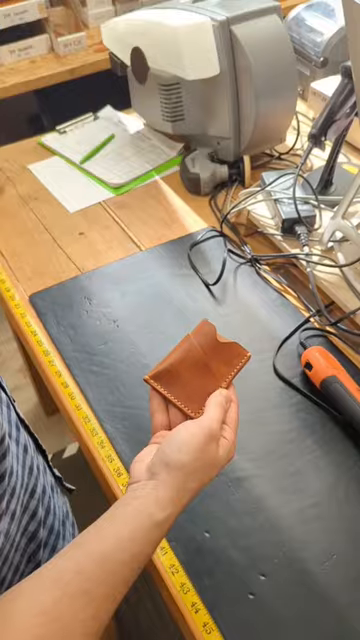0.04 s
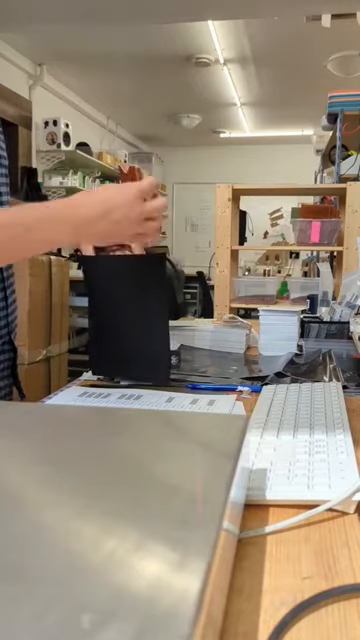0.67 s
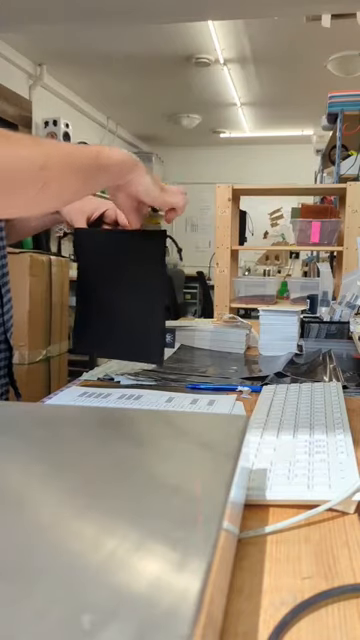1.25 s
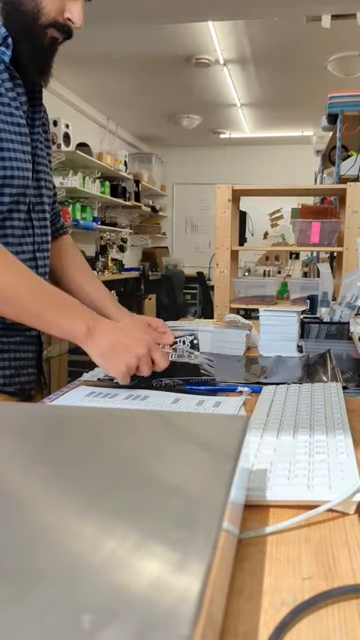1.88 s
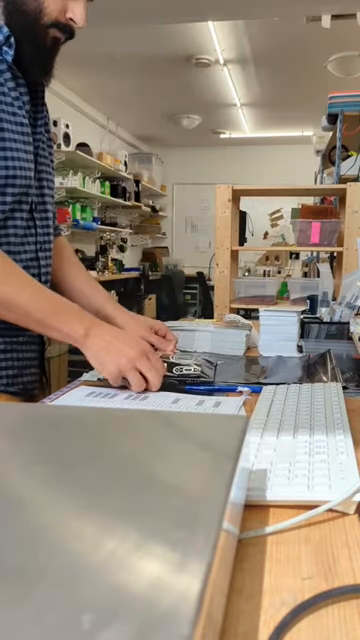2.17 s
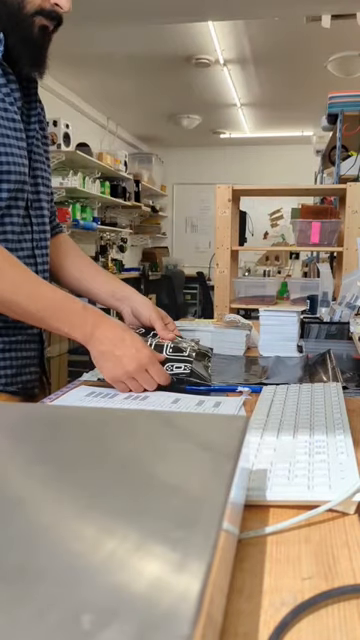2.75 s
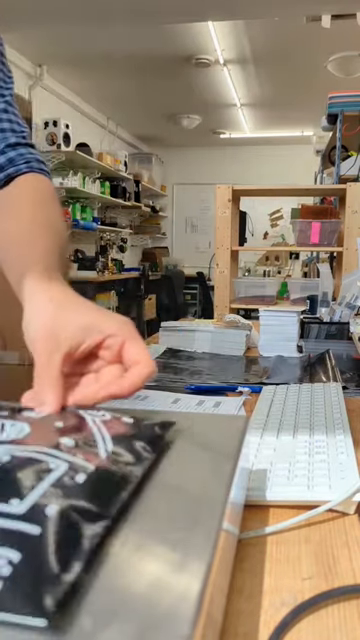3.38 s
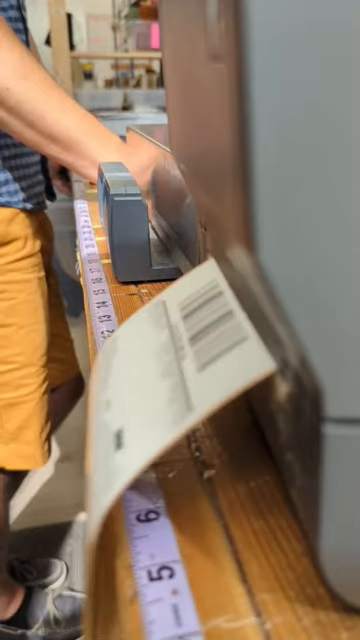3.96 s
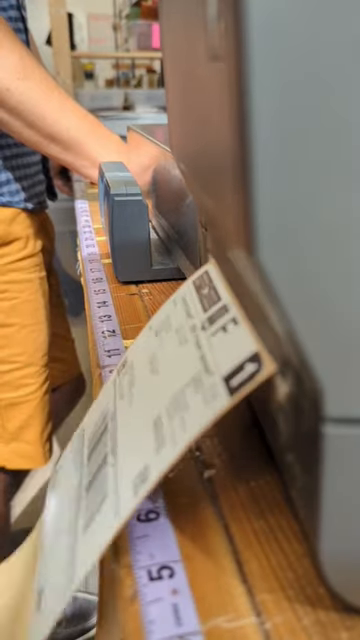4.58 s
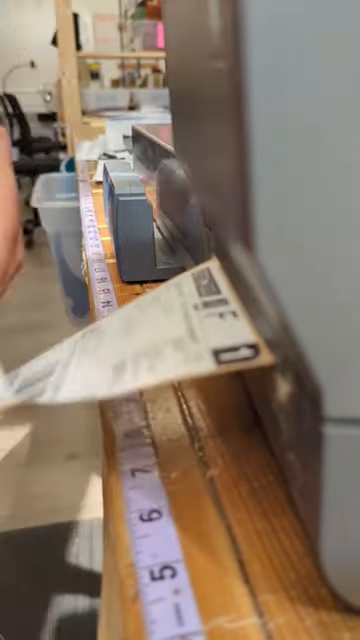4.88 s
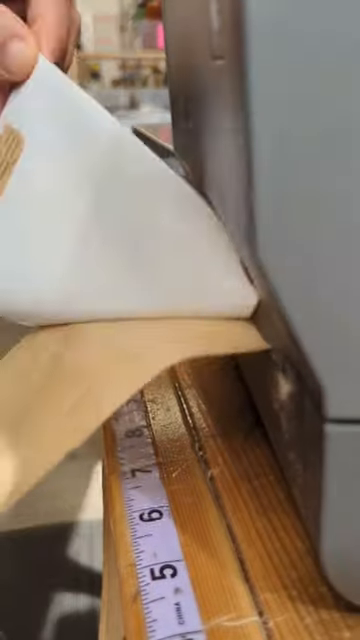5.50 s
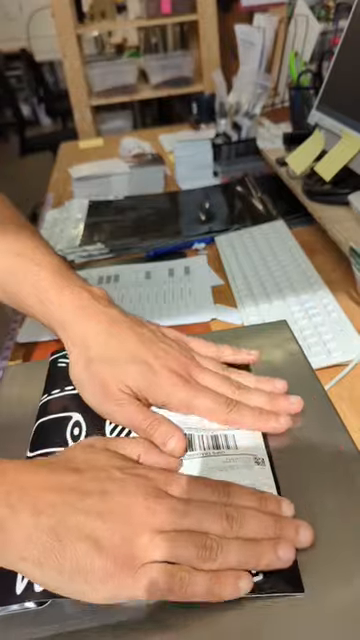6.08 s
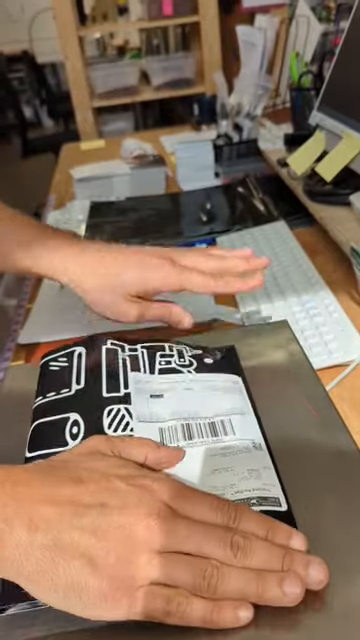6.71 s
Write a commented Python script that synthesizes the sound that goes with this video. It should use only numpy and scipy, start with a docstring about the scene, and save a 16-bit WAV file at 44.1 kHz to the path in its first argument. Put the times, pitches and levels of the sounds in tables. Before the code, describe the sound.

A plastic mailer rustles and cracks, then a label printer whines and squeals, the label rips free and palms smooth it down.

```python
"""A label printer whirs and squeals as an order is packed in a workshop. First a wallet drops into a soft
pouch, and a plastic mailer rustles and cracks as it is folded shut. Then the printer's stepper motor sings
at multiples of its step rate while the label sticks and slips on the roller. The label hisses off its
backing, rips free in a few jerks, and palms smooth it onto the parcel, popping small creases.
Quick fades divide the sound into eight short parts."""
import sys
import numpy as np
from scipy import signal
from scipy.fft import rfft, irfft, next_fast_len
from scipy.io import wavfile
from scipy.ndimage import uniform_filter1d, map_coordinates

SR = 44100
rng = np.random.default_rng(int(sys.argv[2]) if len(sys.argv) > 2 else 0)


def to_wav(s):
    """Save 16-bit WAV."""
    ch = np.atleast_2d(s).T  # columns
    pcm = np.round(np.clip(ch, -1, 1) * 32767)  # PCM
    wavfile.write(sys.argv[1], SR, pcm.astype(np.int16))


N = 297234

# The times in seconds where one part ends and the next begins.
JOINS = [0.61, 1.58, 3.008, 3.674, 4.524, 4.935, 6.042]
# Jerks that rip the label off. Each row: start in seconds, level in dB, bass lift in dB, pitch in Hz.
JERKS = [(5.243, -28, -14, 1500), (5.253, -15.5, 8, 704), (5.266, -19.5, 0, 1410), (5.286, -16, -2, 825),
         (5.315, -15.5, 2, 1410)]
# Spectra: how strong a sound is from low to high. Each row: frequency in Hz, level in dB.
FILM_RUB = [(200, -4.5), (700, 0), (1200, -2.5), (1900, 3), (3200, -5.5), (4800, -15.5), (9000, -55)]  # rubbed plastic film
FILM_CRINKLE = [(1800, -66), (3200, -8), (4900, -10), (6100, -0.5), (9000, -7.5), (15500, -12)]  # its tiny creases
GEAR_RATTLE = [(410, -37.5), (700, -13.5), (807, -4.5), (861, -12), (943, -8), (1320, 1), (1470, -8.5),
               (1690, -8), (2250, -7), (2840, -14), (4580, -22.5), (8500, -31), (15500, -33.5)]  # the printer's gears
LABEL_RUB = [(150, -24), (300, 2.5), (700, 2.5), (1200, 6), (1900, 5), (3000, -0.5), (4500, -16),
             (9000, -52)]  # the rubbed label
GLUE_HISS = [(1800, -37), (3200, -1.5), (6200, 3), (9000, 0), (15500, 0.5)]  # its sticky side


def amp(db):
    """Turn decibels into a gain."""
    return 10 ** (np.asarray(db) / 20)


def unit(x):
    """Scale a signal to an average (rms) level of 1."""
    return x / np.sqrt(np.mean(x ** 2) + 1e-20)


def along(points, hz):
    """Read between (Hz, value) points on a logarithmic frequency axis."""
    freqs, values = np.transpose(points)
    return np.interp(np.log(hz + 1), np.log(freqs + 1), values)


def wobble(rate):
    """A smooth curve through `rate` random values a second."""
    return map_coordinates(rng.standard_normal(4096), [np.arange(N) * rate / SR], mode='wrap')


def phase(hz, jitter, rate):
    """The phase of a slightly unsteady vibration."""
    return 2 * np.pi * np.cumsum(hz * (1 + jitter * wobble(rate))) / SR


def hold(start, stop, attack, release):
    """A gain that rises at start, holds, and dies away after stop (all in seconds)."""
    t = np.arange(N) / SR
    return np.clip((t - start) / attack, 0, 1) * np.exp(-np.maximum(t - stop, 0) / release)


def swell(middle, half_length):
    """A bell-shaped gain (both settings in seconds)."""
    return np.exp(-((np.arange(N) / SR - middle) / half_length) ** 2 / 2)


def colour(x, gain_db):
    """Filter x by the curve gain_db(Hz), ringing only after each sound, never before."""
    size = 2 * next_fast_len(len(x) // 2 + 1024)
    gain = np.maximum(amp(gain_db(np.fft.rfftfreq(size, 1 / SR))), 1e-6)
    cepstrum = irfft(np.log(gain))
    cepstrum[1:size // 2] *= 2  # move the early half of the response onto the late half
    cepstrum[size // 2 + 1:] = 0
    return irfft(rfft(x, size) * np.exp(rfft(cepstrum)), size)[:len(x)]


def shaped(x, spectrum):
    """Filter x by a spectrum table and scale it to level 1."""
    return unit(colour(x, lambda hz: along(spectrum, hz)))


def tone(spectrum, bass_db, treble_db):
    """A spectrum curve with its bass and treble turned up or down."""
    treble = [(1800, 0), (4500, 1.0), (9000, 0.97), (14000, 0.82)]  # Each row: Hz, share of the lift.
    return lambda hz: along(spectrum, hz) + bass_db / (1 + (hz / 650) ** 2) + treble_db * along(treble, hz)


def ringing(sheet, hz):
    """A sheet's spectrum curve plus the broad resonance of one buckled patch at hz."""
    return lambda f: sheet(f) + 7.5 / (1 + ((f - hz) / (0.24 * hz)) ** 2)


def flexing(x, depth_db):
    """Resonances drift at random as a sheet or mechanism moves."""
    bands = signal.stft(x, nperseg=512)[2]
    drift = uniform_filter1d(rng.standard_normal(bands.shape), size=4, axis=0)  # smooth over frequency
    drift = uniform_filter1d(drift, size=9, axis=1)  # and over time
    return signal.istft(bands * amp(depth_db * unit(drift)), nperseg=512)[1][:len(x)]


def grains(rate, spread_db, smooth, life=0.0021):
    """Tiny random slips, each a puff fading over `life` seconds, on a bed of smooth friction noise."""
    sizes = amp(spread_db * rng.uniform(-1.4, 1, N)) * (rng.random(N) < rate / SR)
    power = signal.lfilter([1], [1, -np.exp(-1 / (life * SR))], sizes ** 2)
    return unit(np.sqrt(power) * rng.standard_normal(N)) + smooth * rng.standard_normal(N)


def burst(decay, rise=0.00074):
    """Noise that builds up quickly and falls by 60 dB in `decay` seconds."""
    t = np.arange(SR // 4) / SR
    return rng.standard_normal(len(t)) * amp(-60 * t / max(decay, .001)) * (1 - np.exp(-(t / rise) ** 2))


def sized(x, db):
    """Scale a blow so that its loudest 3 ms have the level db."""
    return amp(db) * x / np.sqrt(uniform_filter1d(x ** 2, size=132).max())


def add(track, seconds, x):
    """Mix x into the track at the given time."""
    start = int(seconds * SR)
    track[start:start + len(x)] += x[:N - start]


def in_room(x, echo_db):
    """A sound followed by the workshop's short, blurred echo."""
    # How long the room rings. Each row: frequency in Hz, seconds to fall by 60 dB.
    decays = [(150, 0.29), (1000, 0.14), (6000, 0.21), (15000, 0.11)]
    hz, t, bands = signal.stft(rng.standard_normal(SR // 3), SR, nperseg=256)
    tail = signal.istft(bands * amp(-60 * t / along(decays, hz)[:, None]), SR, nperseg=256)[1]
    tail *= 1 - np.exp(-np.arange(len(tail)) / SR / 0.00076)
    response = amp(echo_db) * tail / np.linalg.norm(tail)
    response[0] = 1  # the direct sound
    return signal.fftconvolve(x, response)


def handling(effort, rub_spectrum, hiss_spectrum, bump_db, rub_db, crinkle_db, rate, smooth):
    """One effort makes the hands bump the bench, rub the sheet and set off tiny creases."""
    pressure = amp(1.8 * wobble(40))
    creases = flexing(pressure * grains(rate, spread_db=6.5, smooth=smooth), depth_db=2.5)
    hiss = flexing(rng.standard_normal(N), depth_db=0.5)
    # The bumped bench. Each row: frequency in Hz, level in dB.
    bench = [(25, -51), (60, 0.5), (150, 2.5), (290, -3), (480, -8.5), (1000, -58.5)]
    return effort * (amp(bump_db) * shaped(pressure * rng.standard_normal(N), bench)
                     + amp(rub_db) * shaped(creases, rub_spectrum)
                     + amp(crinkle_db) * shaped(creases + hiss, hiss_spectrum))


def buckle(crack, db, sheet, echo_db):
    """A crack rings a buckled patch of a sheet, coloured by a close echo off the bench at a random delay."""
    spacing_hz = 1100 + 700 * rng.random()  # between the ripples of a close echo off the bench
    ring = colour(crack, lambda hz: sheet(hz) + 3 * np.cos(2 * np.pi * hz / spacing_hz))
    return in_room(sized(ring, db - 9.5), echo_db)


def room_tone():
    """Still air at first, a fan at the packing bench, a hush at the printer, and a thin high hiss."""
    # The three backgrounds. Each row: frequency in Hz, level in dB.
    still = [(30, -24), (235, -2.5), (1400, -17), (1900, -3.5), (4600, -15), (6000, -9), (15500, -16.5)]
    fan = [(30, -15), (120, -5.5), (175, -14), (245, 6.5), (310, -21), (480, -3), (700, -18), (1500, -18),
           (1870, 0), (2200, -14.5), (3100, -10), (4700, -25), (6200, -15), (9300, -29.5)]
    hush = [(30, -25), (235, -1), (2000, -11.5), (2900, -8), (9000, -32), (15500, -29)]
    t = np.arange(N) / SR
    air = lambda spectrum: shaped(rng.standard_normal(N), spectrum)
    thin_hiss = amp(-86.5) * wobble(600) * np.sin(2 * np.pi * 12250 * t)
    return (amp(-84) * air(still) * (t < JOINS[0])
            + amp(-68) * air(fan) * (t > JOINS[0]) * (t < JOINS[3])
            + amp(-63.5) * air(hush) * (t > JOINS[4]) * (t < JOINS[5])
            + thin_hiss * np.where(t < JOINS[0], .5, 1))


def ticks():
    """Light, distant ticks, each a bright burst of noise."""
    # Each row: start in seconds, level in dB.
    events = [(0.339, -51), (0.4502, -46), (1.386, -47.5)]
    # A tick's spectrum. Each row: frequency in Hz, level in dB.
    spectrum = [(300, -14), (1400, -6.5), (3500, -11.5), (6800, 5), (9000, -3.5), (15000, -12)]
    out = np.zeros(N)
    for start, db in events:
        tick = shaped(burst(decay=0.16), spectrum)
        add(out, start, in_room(sized(tick, db - 13.5), echo_db=-14))
    return out


def pouch():
    """The soft pouch bumps as it is held and shaken open, and rustles round the wallet that drops in."""
    pick_up_s, shake_s, drop_s = 0.69, 0.92, 1.02
    held = hold(pick_up_s, drop_s, attack=.03, release=0.13)
    held += amp(8.5) * hold(shake_s, drop_s, attack=0.011, release=0.065)
    drop = hold(drop_s, drop_s + 0.04, attack=0.0079, release=0.059)
    film = FILM_RUB, FILM_CRINKLE
    return (handling(held, *film, bump_db=-75, rub_db=-85, crinkle_db=-101, rate=740, smooth=1.9)
            + handling(drop, *film, bump_db=-56, rub_db=-53, crinkle_db=-79, rate=1600, smooth=1.2))


def knocks():
    """Soft, dull contacts of pouch, parcel and flapping label, and the printer's rattle and clunk as it stops."""
    # Each row: start in seconds, level in dB, bass lift in dB, decay in seconds.
    events = [(1.025, -33.5, 3, 0.25), (3.609, -32, -8, 0.04), (4.436, -29, -18, 0.072),
              (4.532, -19, -26, 0.03), (4.625, -41.5, -45, 0.13), (4.845, -41.5, 16, 0.015),
              (5.16, -28, -18.5, 0.082), (5.529, -43, -15, 0.3), (5.714, -42.5, 30, 0.048)]
    # A knock's spectrum. Each row: frequency in Hz, level in dB.
    spectrum = [(35, -24), (100, -14), (340, -1.5), (1300, -9), (2800, -20), (9500, -37)]
    out = np.zeros(N)
    for start, db, bass_db, decay in events:
        push = colour(burst(decay, rise=0.0011), tone(spectrum, bass_db, treble_db=-8.5))
        add(out, start + 0.000974, in_room(sized(push, db - 9.5), echo_db=-9))
    return out


def thumps():
    """A blow on parcel, bench or printer case, or a pocket of air trapped in the mailer just after a snap,
    rings one low, short note, blurred by its neighbours."""
    # Each row: start in seconds, level in dB, pitch in Hz, decay in seconds.
    events = [(1.027, -39, 268, 0.17), (1.483, -46.5, 158, 0.07), (1.504, -45, 400, 0.021),
              (1.51, -44.5, 104, 0.064), (1.939, -47, 239, 0.24), (1.966, -43.5, 134, 0.049),
              (3.593, -31.5, 502, 0.02), (3.648, -30.5, 527, 0.017), (4.44, -31, 292, 0.061),
              (4.459, -27, 297, 0.07), (4.534, -16, 334, 0.019), (4.556, -41, 293, 0.13),
              (5.266, -42.5, 145, 0.31), (5.291, -37, 230, 0.056), (6.28, -48, 220, 0.04),
              (6.458, -39, 153, 0.12)]
    out, t = np.zeros(N), np.arange(SR // 4) / SR
    for start, db, hz, decay in events:
        blur = 2.5 * burst(decay)
        note = np.sin(2 * np.pi * hz * t) * amp(-60 * t / decay)
        thump = shaped(note + blur, [(hz / 4, -20), (hz * 0.76, 0), (hz * 2.04, 0), (hz * 10, -45)])
        add(out, start, in_room(sized(thump, db - 5), echo_db=-13))
    return out


def finger_strokes():
    """Fingers slide over pouch, mailer and label; each slide rubs and hisses as it swells and fades."""
    # Each row: middle in seconds, half length in seconds, level in dB, hiss lift in dB.
    events = [(1.507, 0.019, -63, 7), (1.665, 0.016, -54.5, 1.5), (1.75, 0.026, -63.5, 1),
              (1.988, 0.035, -62.5, 3.5), (2.292, 0.029, -65.5, 4.5), (2.485, 0.066, -63, -11),
              (2.81, 0.027, -58, -1), (3.334, 0.02, -61, 7), (3.393, 0.014, -56, -10),
              (3.411, 0.027, -68, 21.5), (6.441, 0.017, -52, -1)]
    creases = flexing(grains(rate=600, spread_db=4, smooth=.5), depth_db=3)
    rub, hiss = shaped(creases, FILM_RUB), shaped(creases, FILM_CRINKLE)
    slides = sum(amp(db) * swell(middle, half_length) * (rub + amp(lift_db - 10.5) * hiss)
                 for middle, half_length, db, lift_db in events)
    return amp(2.5) * in_room(slides, echo_db=-8)[:N]


def folding():
    """The mailer's film stirs all the while it is folded and pressed shut."""
    # How hard the hands work. Each row: time in seconds, effort in dB.
    efforts = [(1.62, -62), (1.87, -66.5), (2.36, -66), (2.7, -64), (2.87, -61), (3.27, -67.5),
               (3.5, -61.5), (3.62, -58), (3.65, -46.5)]
    times, effort_db = np.transpose(efforts)
    effort = amp(np.interp(np.arange(N) / SR, times, effort_db))
    effort *= hold(JOINS[1], JOINS[3], attack=0.095, release=0.017)
    return handling(effort, FILM_RUB, FILM_CRINKLE,
                    bump_db=-7.5, rub_db=1.5, crinkle_db=-7.5, rate=150, smooth=0.92)


def scrunches():
    """The film crumples: one crease sets off the next, each weaker than the last."""
    # Each row: start in seconds, level of the first crease in dB, length in seconds.
    events = [(1.904, -37, 0.05), (2.721, -44.5, 0.018), (2.935, -42, 0.02)]
    # Crumpling film. Each row: frequency in Hz, level in dB.
    spectrum = [(200, -5.5), (1900, 5), (3000, -3), (6200, -3.5), (7500, -23), (15500, -32)]
    gap_s, fade_db_per_s = 0.0075, 162
    out = np.zeros(N)
    for start, db, length in events:
        for delay in np.arange(0, length, gap_s):
            crease = sized(shaped(burst(decay=0.019), spectrum), db - 9.5 - fade_db_per_s * delay)
            uneven_delay = delay * (1 + .04 * rng.standard_normal())
            add(out, start + 0.0012 + uneven_delay, in_room(crease, echo_db=-10))
    return out


def snaps():
    """Film or paper buckles with a sharp crack, rings for a moment and flutters after it."""
    # Each row: start in seconds, level in dB, brightness in dB.
    events = [(2.056, -37.5, 3.5), (2.408, -39, -2), (2.617, -38, -10), (2.937, -32, 5.5),
              (2.946, -34.5, 18), (3.022, -33.5, 3), (3.196, -38, -4.5), (3.481, -35.5, -3),
              (3.4915, -21, 12), (3.5912, -23, 1), (3.6465, -21, 0), (3.6555, -36, -4), (4.715, -39, 4),
              (5.462, -38.5, 2), (5.58, -30, -7), (5.773, -37.5, -7)]
    # The buckling sheet. Each row: frequency in Hz, level in dB.
    spectrum = [(60, -44), (130, -21.5), (650, 5.5), (1000, -7), (1400, -11), (3400, -5.5), (5000, -9),
                (6100, -6), (15500, -26.5)]
    out = np.zeros(N)
    for start, db, bright_db in events:
        crack = burst(decay=0.0052, rise=0.00099)
        flutter = amp(-34.5) * burst(decay=0.11, rise=0.00021)
        sheet = tone(spectrum, bass_db=-5 - bright_db, treble_db=-12 + 0.82 * bright_db)
        add(out, start + 0.00145, buckle(crack + flutter, db, sheet, echo_db=-9))
    return out


def air_pockets():
    """Air trapped in the mailer drums under the fingers: hollow notes, pitched by each pocket's size."""
    # Each row: middle in seconds, half length in seconds, level in dB, pitch in Hz.
    events = [(2.233, 0.017, -53, 641), (2.547, 0.011, -54, 400), (2.793, 0.009, -47.5, 510),
              (2.828, 0.013, -50, 610), (2.945, 0.0056, -47, 560), (3.363, 0.038, -55, 429),
              (3.397, 0.012, -49, 587), (6.442, 0.024, -51.5, 521)]
    sharpness, octave_db = 7, -8
    note = lambda hz: np.sin(phase(hz, jitter=1 / sharpness, rate=400))
    drum = sum(amp(db) * swell(middle, half_length) * (note(hz) + amp(octave_db) * note(2 * hz))
               for middle, half_length, db, hz in events)
    return in_room(drum * amp(3 * wobble(200)), echo_db=-8)[:N]


def printer():
    """The stepper motor sings at multiples of its step rate and drives rattling gears and a roller."""
    # The motor's tones. Each row: multiple of the step rate, level in dB.
    motor_tones = [(2, -47.5), (3, -52), (4, -51), (5, -53.5)]
    # The rubber roller's rumble. Each row: frequency in Hz, level in dB.
    roller = [(85, -55), (130, -16.5), (216, -15), (263, 3), (516, -6), (633, -0.5), (698, -13.5),
              (823, -9.5), (1870, -75)]
    step_hz, surge_s, surge_width_s = 437.5, 3.755, 0.056
    t = np.arange(N) / SR
    drive = hold(start=3.675, stop=4.5, attack=0.06, release=0.0043)
    step = phase(step_hz, jitter=0.00216, rate=60)
    whine = np.zeros(N)
    for multiple, db in motor_tones:
        level = amp(db + 1.5 + 2.4 * wobble(35))
        gear_play = (.25 + .35 * (multiple % 2)) * wobble(45)  # roughens the odd multiples most
        whine += level * np.sin(multiple * step + gear_play + rng.uniform(0, 2 * np.pi))
    unevenness = amp(1.9 * wobble(180))
    teeth = rng.standard_normal(N) * (1 + 0.19 * np.cos(step)) * unevenness  # rasp pulsing at each step
    rumble = amp(-47.5) * shaped(rng.standard_normal(N), roller)
    surge_db = 4 * np.exp(-((t - surge_s) / surge_width_s) ** 2)  # the gears take up the load
    gears = amp(-44 + surge_db) * shaped(flexing(teeth, depth_db=1.5), GEAR_RATTLE)
    return drive * (whine + gears + rumble)


def label_slips():
    """The label catches in the slot and slips, each time with one rough chirp."""
    # Each row: start in seconds, level in dB.
    events = [(3.745, -27), (3.796, -27.5), (3.919, -25.5), (3.944, -25.5), (3.9475, -20), (4.099, -22),
              (4.337, -26), (4.365, -26.5)]
    chirp_hz, rise_s = 1480, 0.0012
    out, t = np.zeros(N), np.arange(SR // 20) / SR
    kick = t / rise_s * np.exp(1 - t / rise_s)
    for start, db in events:
        hz = chirp_hz * (1 + 0.04 * rng.standard_normal())
        chirp = np.sin(2 * np.pi * hz * t) + 0.45 * shaped(rng.standard_normal(len(t)), GEAR_RATTLE)
        add(out, start, in_room(amp(db - 5) * kick * chirp, echo_db=-8))
    return out


def label_squeal():
    """The label sticks and slips on the roller so fast that it gives a wavering squeal."""
    # Each row: start and stop in seconds, level in dB, lift of the top overtone in dB.
    events = [(3.746, 3.82, -51.5, 7), (3.954, 4.066, -42.5, -3), (4.357, 4.425, -46, 6)]
    # The squeal's tones. Each row: multiple of the pitch, level in dB.
    overtones = [(1, 3), (2, -11), (3, -13.5), (4, -26), (6, -26.5)]
    cycle = phase(hz=1620, jitter=0.0021, rate=140)
    out = np.zeros(N)
    for start, stop, db, lift_db in events:
        grip = amp(db) * hold(start, stop, attack=0.033, release=0.017)
        wave = sum(amp(tone_db + lift_db * (multiple - 1) / 5) * np.sin(multiple * cycle)
                   for multiple, tone_db in overtones)
        out += grip * np.sqrt(2) * wave
    return in_room(out * amp(1.3 * wobble(120)), echo_db=-17)[:N]


def peeling():
    """Fingers grip the label, which hisses off its backing; once torn free, the strip also bumps about."""
    grip = hold(JOINS[5], JOINS[5] + 0.059, attack=0.0053, release=0.014)
    pull = hold(JOINS[5], JOINS[6], attack=0.065, release=0.013)
    flap = hold(JERKS[-1][0], JOINS[6], attack=.03, release=0.006)
    label = LABEL_RUB, GLUE_HISS
    return (amp(-68.5) * grip * shaped(rng.standard_normal(N), FILM_RUB)
            + handling(pull, *label, bump_db=-86, rub_db=-68, crinkle_db=-62, rate=3200, smooth=1.3)
            + handling(flap, *label, bump_db=-72.5, rub_db=-66.5, crinkle_db=-76, rate=220, smooth=0.77))


def rip():
    """The strip creaks taut, then tears; each jerk cracks the hanging label and parts crackling fibres."""
    # The ripping label. Each row: frequency in Hz, level in dB.
    paper = [(60, -40), (150, -18), (680, 1.5), (1000, -5), (1500, -3), (2000, -5.5), (3000, -13.5),
             (4200, -10.5), (6000, -8.5), (9500, -16), (15500, -17.5)]
    strain_s, tear_s = 5.229, 5.252
    strain = amp(-52) * hold(strain_s, tear_s, attack=0.0017, release=0.0051)
    tear = amp(-40) * hold(tear_s, JERKS[-2][0], attack=0.0069, release=0.0065)
    out = (strain + tear) * shaped(grains(rate=430, spread_db=18, smooth=0.23), paper)
    fibres = unit(colour(grains(rate=900, spread_db=6, smooth=.3), tone(paper, 0, treble_db=5)))
    for start, db, bass_db, hz in JERKS:
        crack = burst(decay=0.013, rise=0.00068)
        sheet = ringing(tone(paper, bass_db, treble_db=0), hz)
        add(out, start + .0015, buckle(crack, db, sheet, echo_db=-7))
        out += amp(db - 24) * hold(start + .003, start + .003, attack=.001, release=0.014) * fibres
    return out


def smoothing():
    """Palms sweep evenly over the label on the parcel."""
    sweep = hold(JOINS[6], N / SR, attack=0.042, release=.05)
    return handling(sweep, LABEL_RUB, GLUE_HISS,
                    bump_db=-60.5, rub_db=-55, crinkle_db=-62, rate=120, smooth=0.96)


def crease_pops():
    """Each crease that a palm flattens pops at its own pitch and is damped at once."""
    # Each row: start in seconds, level in dB, pitch in Hz, treble lift in dB.
    events = [(6.203, -32.5, 1680, 6), (6.279, -25, 1190, -8), (6.322, -33.5, 2900, -4),
              (6.34, -32.5, 1170, -2), (6.445, -34, 3040, 1), (6.463, -31, 1100, -1.5),
              (6.473, -39, 1690, -4), (6.549, -26.5, 1520, 2.5), (6.597, -34, 1580, -7),
              (6.633, -32.5, 1560, -16)]
    # Film under flat palms. Each row: frequency in Hz, level in dB.
    parcel = [(100, -18), (220, 1.5), (750, -10.5), (1180, 0), (2000, -3.5), (2700, -5), (3800, -13.5),
              (15500, -27.5)]
    out = np.zeros(N)
    for start, db, hz, treble_db in events:
        pop = colour(burst(decay=0.0079), ringing(tone(parcel, 0, treble_db), hz))
        add(out, start + 0.001007, in_room(sized(pop, db - 7.5), echo_db=-8))
    return out


def scene():
    """All sources mixed into one channel."""
    hands = pouch() + folding() + peeling() + smoothing() + finger_strokes() + air_pockets()
    contacts = snaps() + scrunches() + crease_pops() + rip() + knocks() + ticks() + thumps()
    return (room_tone() + hands + contacts + printer() + label_squeal() + label_slips())[None]


def record(dry):
    """The sound fades out and back in at every join, and the highest treble is removed."""
    fade_s, top_hz = 0.029, 15700
    to_nearest_join = np.abs(np.arange(N)[:, None] / SR - np.array(JOINS)).min(axis=1)
    fade = np.minimum(to_nearest_join / fade_s, 1) ** 1.12
    size = next_fast_len(N + SR // 2)
    passband = np.fft.rfftfreq(size, 1 / SR) < top_hz
    return irfft(rfft(dry * fade, size) * passband, size)[:, :N]


dry = scene()
out = record(dry)
to_wav(out)
```